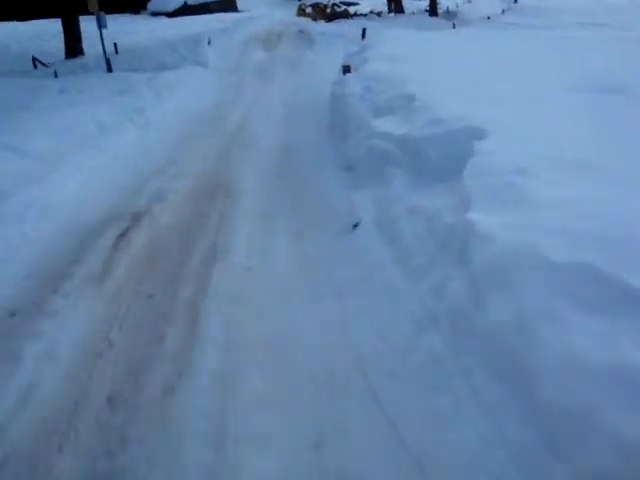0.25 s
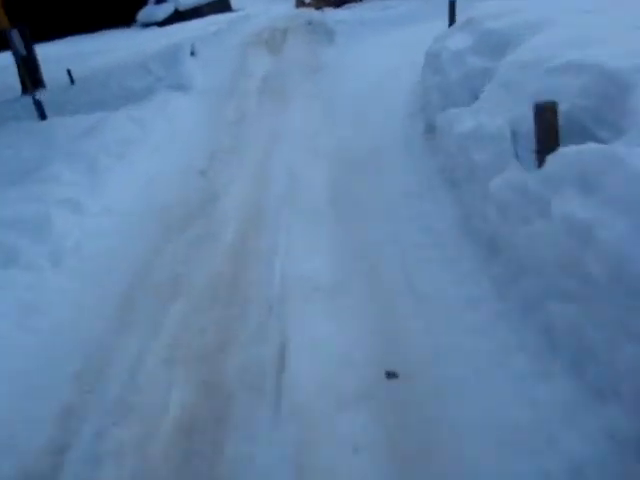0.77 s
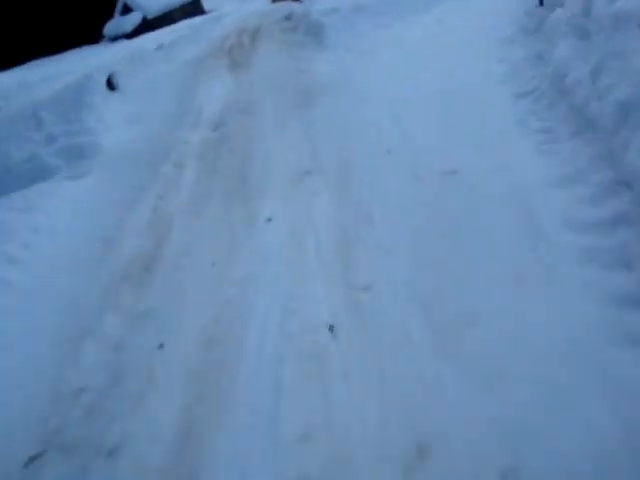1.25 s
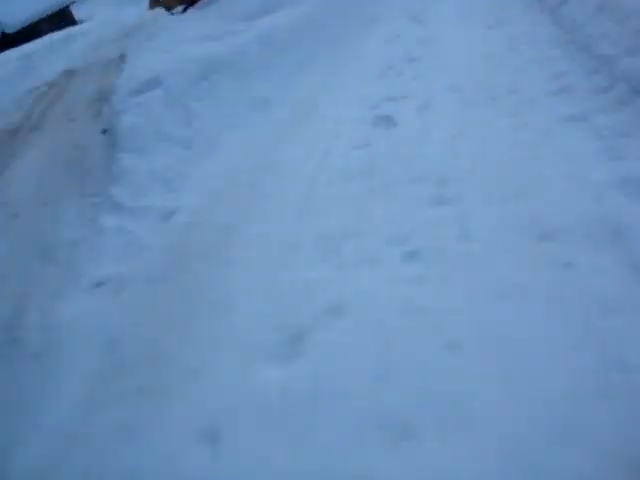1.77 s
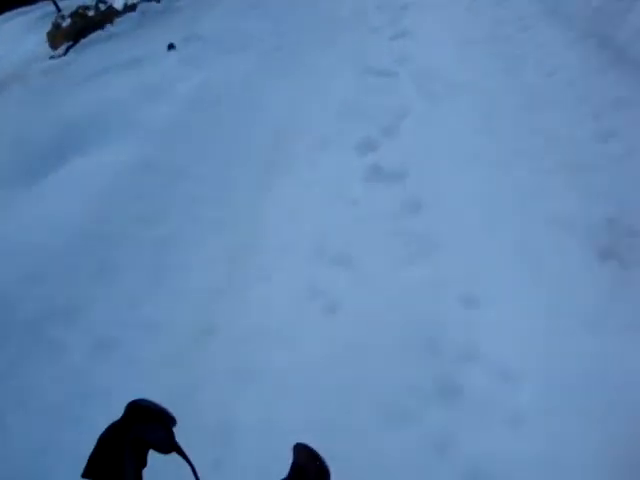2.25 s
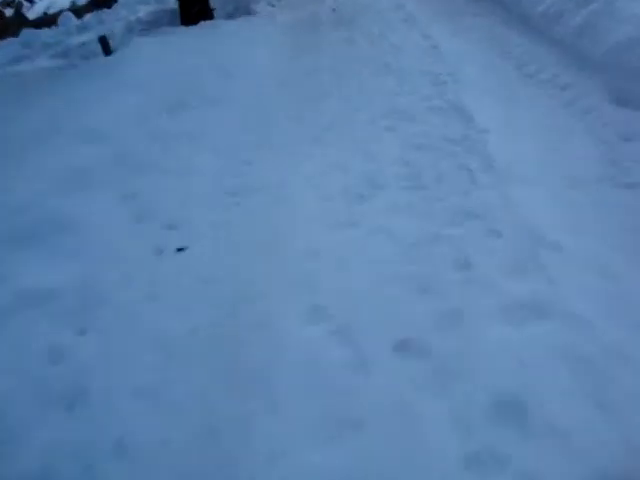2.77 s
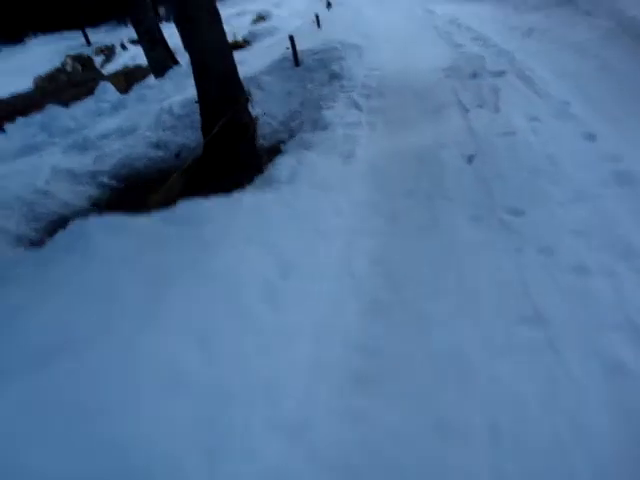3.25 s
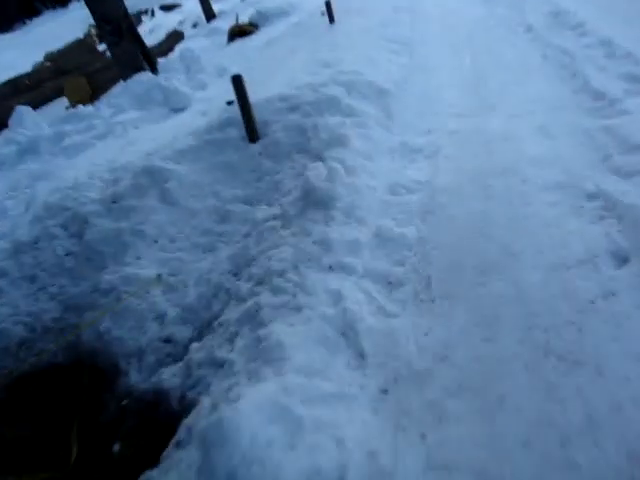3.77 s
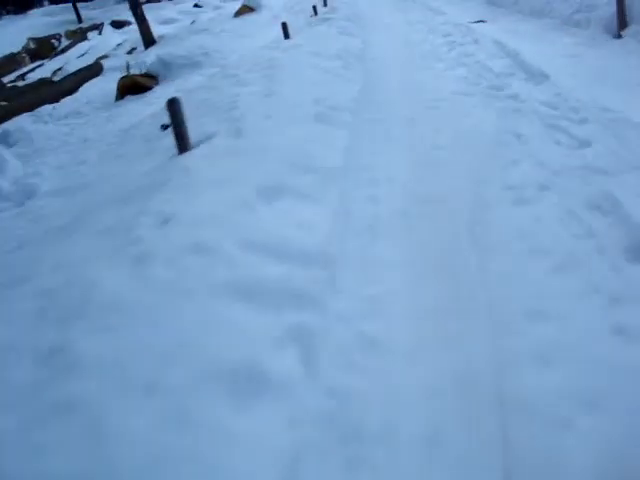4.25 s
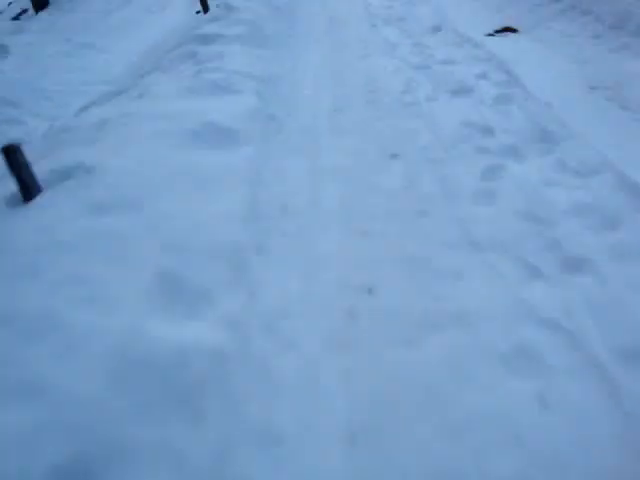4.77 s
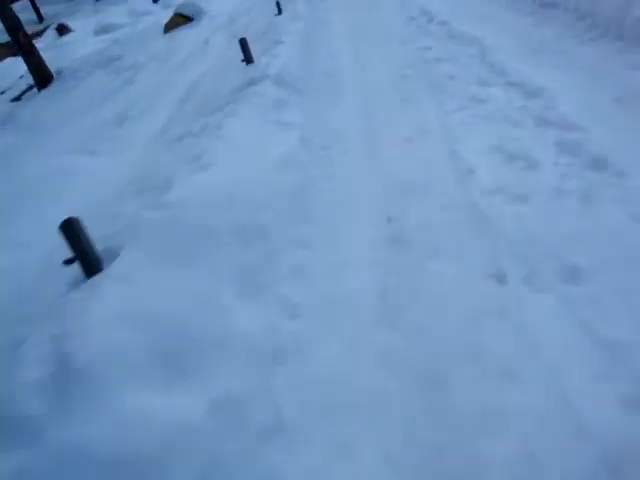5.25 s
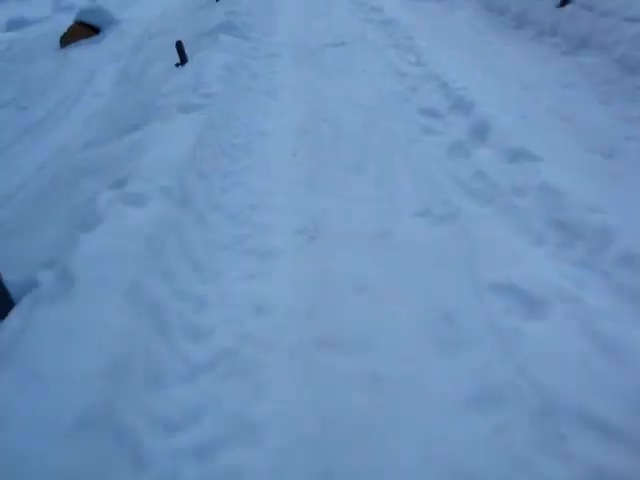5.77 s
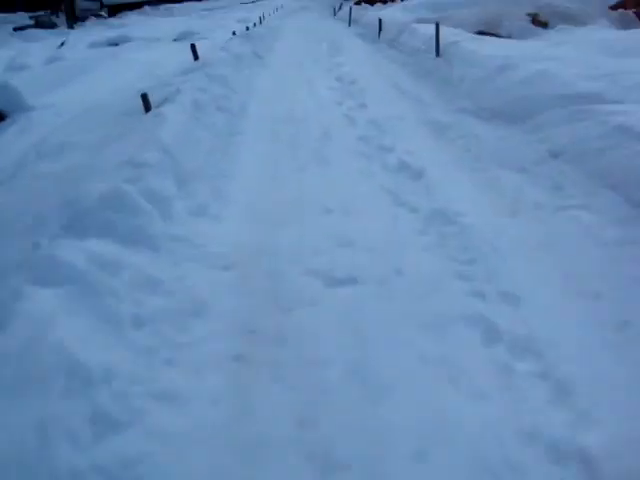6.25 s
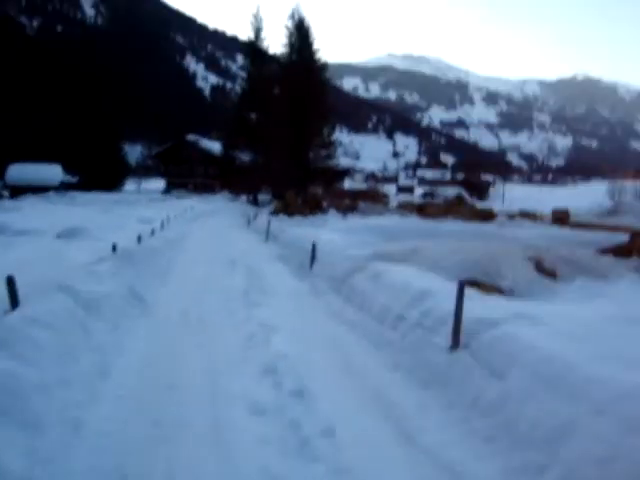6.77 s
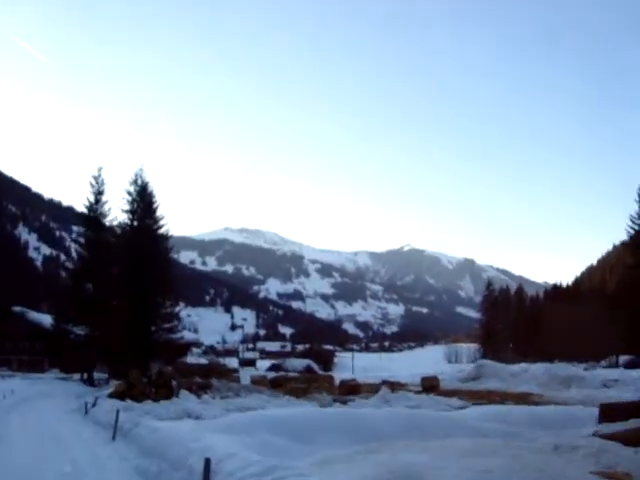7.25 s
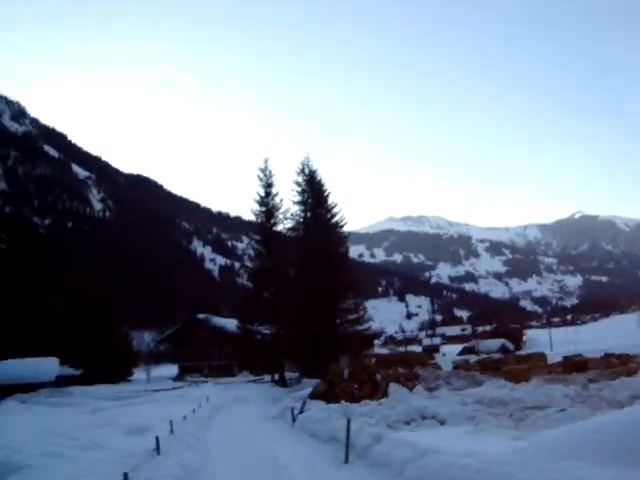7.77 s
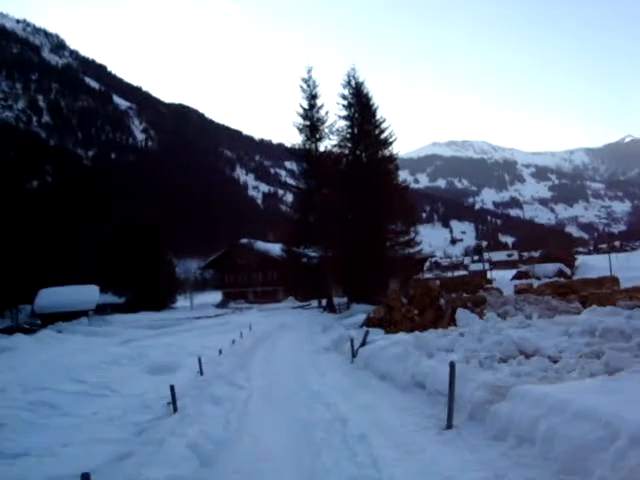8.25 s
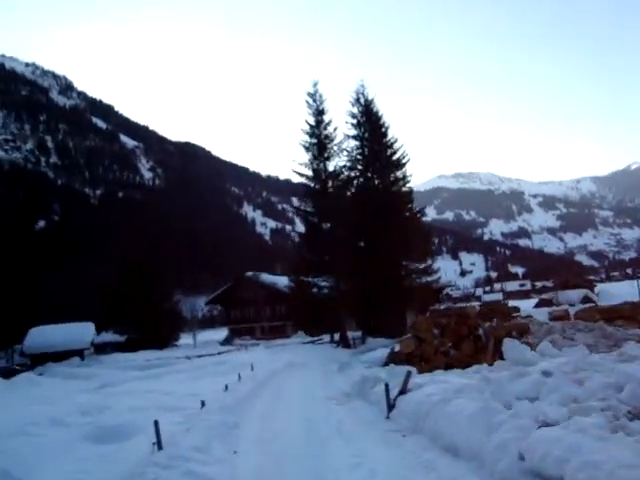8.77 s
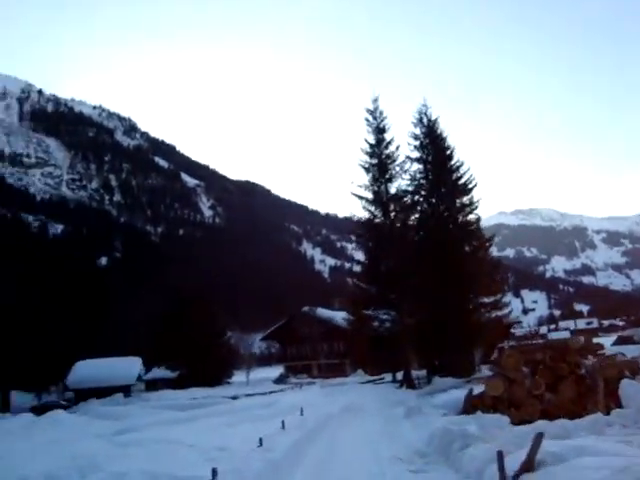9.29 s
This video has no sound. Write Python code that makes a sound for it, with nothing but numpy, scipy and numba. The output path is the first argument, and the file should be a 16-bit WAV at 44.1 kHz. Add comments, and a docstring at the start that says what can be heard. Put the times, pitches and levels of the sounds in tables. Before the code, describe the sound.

A wooden sled grinds and jolts over packed snow and ice, steel runners ringing and hissing, while wind roars and crackles across the microphone.

```python
"""On a packed snow track, a small camera rides on a wooden sled, its microphone close to runners and wind.
It opens in steady wind with three cracks; near 1 s the steel runners sing on ice and squeak twice.
From 2 to 6.3 s ridges jolt the sled; ground ice grains ring the frame and spray hisses under short gusts.
Wind returns at 6.4 s; near 7.1 to 7.6 s the runners almost vanish and hard eddies crack on the port.
Then the runners come back, jolting to the end. Grains and blows drive resonances; eddies are pulses."""
import sys
import numpy as np
from scipy import signal
from scipy.fft import rfft, irfft, next_fast_len
from scipy.io import wavfile
from scipy.ndimage import uniform_filter1d
from numba import njit

SR = 44100
rng = np.random.default_rng(int(sys.argv[2]) if len(sys.argv) > 2 else 0)


def waveform_to_disk(signal):
    """Save audio, clipped to [-1, 1], as 16-bit WAV at the path in sys.argv[1]."""
    frames = np.transpose(np.atleast_2d(signal))
    scaled = np.clip(frames, -1, 1) * 32767
    samples = np.round(scaled).astype(np.int16)
    wavfile.write(sys.argv[1], SR, samples)


N = 419832

# All levels are relative, ahead of the mix and the microphone.
# Runners under full load: start_s, spray_hiss_db, frame_ring_above_hiss_db
RUN = [(0, -34, 13.5), (.6, -33, 6), (.8, -33, 7), (1.05, -23.5, 2.5), (1.5, -21.5, 2), (2.0, -23, 3.5),
       (2.7, -24, 4), (3.25, -30, 2.5), (3.6, -21.5, 0.5), (3.95, -26.5, 1), (4.3, -32.5, 5.5),
       (4.55, -29.5, 2), (5.2, -26, 3.5), (6.0, -27, 4), (6.2, -26, 2.5), (6.5, -29.5, 3.5), (6.85, -28, 4),
       (7.06, -42.5, 13), (7.59, -57.5, 21.5), (7.7, -30, 10), (7.95, -34.5, 9), (8.4, -36, 10),
       (8.7, -34, 11.5), (9.25, -28.5, 8.5), (9.52, -24.5, 4)]
BUMPY_DB = 1.49  # spread of the fast bumps of the track
# Icy stretch: start_s, singing_above_hiss_db
ICE = [(.75, -6), (.92, 1.5), (1.12, 2), (1.3, -4), (3.2, -12)]
# Runners grind over ridges: peak_s, level_db, fall_by_6_db_ms (anything under .5 counts as .5 for the grind)
RIDGES = [(0.962, -13, 4), (2.099, -3, 5.5), (2.362, -2.5, 8), (2.437, -5.5, 5), (2.723, -14, 7),
          (3.118, -17, 19), (3.205, -2, 1), (3.227, -4.5, 23), (3.392, -11, 9), (3.513, 2, 2.5),
          (3.535, 0.5, 2), (3.603, -4.5, 4.5), (3.81, -8.5, 3.5), (3.897, -8, 1.5), (3.918, -2, 5.5),
          (3.938, -10, 34), (4.131, -8, 2), (4.152, -7, 6), (4.226, -1, 2.5), (4.243, -5.5, -1),
          (4.27, -8, 2.5), (4.281, 0, 1.5), (4.288, -4, 2), (4.317, -6, 2.5), (4.406, -12, 5),
          (4.504, -8, 63), (4.68, -5.5, 6), (4.729, -12, 6), (4.804, -9, 5), (4.824, -7, 2), (4.86, -8, 5),
          (5.191, -13, 2), (5.201, -8.5, 3), (5.384, -6, 2.5), (5.434, -7, 7), (5.468, -7, 4),
          (5.54, -9, 4), (5.713, -6, -2), (5.82, -11, 2), (6.077, -14, 4), (6.14, -6, 4), (6.195, -3, 3),
          (6.222, -3, -1), (6.249, -12, -1), (6.259, -6, 0), (6.825, -27, 37), (7.873, -12, 13),
          (7.924, -17, 8), (7.969, -8, 0), (8.081, -7.5, 9.5), (8.137, -5, 4), (8.143, -5, -1),
          (8.174, -4, 1), (8.208, -8.5, 4), (8.224, -6, 2), (8.324, -2.5, 4), (8.38, -8, -2),
          (8.429, -11, 3), (8.567, -16, 17), (8.61, -8.5, 16), (8.632, -5.5, 4), (8.697, -5.5, 11),
          (8.727, -10, 18), (8.756, -5, 4), (8.825, -17, 12), (8.964, -2.5, 2), (8.986, -2.5, 1.5),
          (9.032, -18, 4), (9.252, -5.5, 14), (9.408, -4, 11), (9.455, -11, -3), (9.489, -8, 8)]
JOLT_RISE_MS = 1.25  # the last 6 dB up to the peak
BLOW_DB, BLOW_DB_PER_MS = 6.5, -1.6  # a longer ridge is gentler
# The sled bounces and its runners grow light: landing_s, loss_just_before_db, length_s
HOPS = [(0.752, -8.5, 0.072), (1.271, -5.5, 0.19), (1.688, -4.5, 0.15), (2.209, -3.5, 0.24),
        (2.537, -5, 0.21), (2.843, -9.5, 0.079), (3.543, -8, 0.22), (3.813, -11.5, 0.2), (3.882, -7, 0.11),
        (4.087, -4.5, 0.04), (4.216, -18.5, 0.062), (4.787, -13.5, 0.0075), (4.932, -7, 0.087),
        (5.375, -5.5, 0.094), (5.417, -28, 0.026), (5.99, -4.5, 0.03), (6.116, -13, 0.027),
        (6.472, -10.5, 0.22), (6.789, -9.5, 0.18), (7.661, -21, 0.02), (7.904, -15, 0.26),
        (8.127, -8, 0.088), (8.365, -7.5, 0.1), (8.979, -7, 0.056), (9.386, -7.5, 0.15),
        (9.437, -17, 0.053)]
HOP_CURVE, LAND_S = 0.5, 0.015  # exponent of the loss; time for the load to return
# Resonances of the frame: centre_hz, width_hz, level_db
FRAME = [(966, 420, -4.5), (1376, 182, 3), (1847, 198, 0), (2410, 266, -2), (2970, 420, -11.5)]
# Steel runners singing on ice: centre_hz, width_hz, level_db
STEEL = [(1420, 120, 9), (2350, 56, 2), (3685, 200, 4.5)]
# Colour of the spray of crushed snow: frequency_hz, level_db (per Hz)
SPRAY = [(40, -64), (300, -16.5), (800, -7.5), (2000, -9), (3200, -0.5), (3700, -2), (4300, -3),
         (5500, -3.5), (7500, -11.5), (10400, -17)]
# A runner squeaks: start_s, length_s, start_pitch_hz, end_pitch_hz, level_db
SQUEAKS = [(0.852, 0.043, 2110, 2580, -28), (1.008, 0.022, 2330, 2320, -21), (6.494, 0.1, 1340, 1470, -27),
           (6.821, 0.037, 2320, 2340, -21)]
SQUEAK_WIDTH_HZ = 35.  # at the start pitch
# Steady wind at the microphone:
# start_s, level_db, eddy_pitch_hz, small_sharp_eddies_db, large_eddies_db (both against the level)
WIND = [(0, -25.5, 545, 2.5, -3), (.32, -26, 628, 5.5, -7.5), (.61, -19.5, 590, -8, -18),
        (.86, -22, 488, -4, -25), (1.08, -27, 423, -9, -14), (1.19, -42, 595, -7, -29),
        (1.9, -51.5, 740, -2, 1.5), (6.33, -52.5, 663, -1.5, -1), (6.39, -25.5, 335, -3, 4),
        (6.48, -22.5, 424, 3.5, 1), (6.64, -28, 448, -11, -10), (6.67, -16.5, 380, -5, -23),
        (6.72, -16.5, 517, -10.5, -25), (6.77, -17.5, 430, -11, -21), (6.82, -27, 412, 4, 0.5),
        (7.03, -18.5, 453, -6.5, 0.5), (7.15, -22.5, 652, 0, -7.5), (7.6, -25.5, 643, 4.5, -4),
        (7.63, -28.5, 507, 1.5, 1), (7.9, -34, 430, -0.5, 0), (8.24, -27.5, 345, -14, -3),
        (8.58, -25, 287, -9, -4), (8.66, -32.5, 312, -31, 4), (9.52, -37.5, 380, -24, 3)]
STEADY_BUSY = 2.2  # eddies of a steady wind come at least this many times as often as usual
# Short gusts: start_s, length_s, level_db, eddy_pitch_hz
GUSTS = [(2.111, 0.14, -35, 420), (2.383, 0.069, -38.5, 502), (2.794, 0.036, -33, 490),
         (2.877, 0.075, -22.5, 480), (2.98, 0.1, -32.5, 402), (5.473, 0.026, -38, 580),
         (5.621, 0.11, -26.5, 400), (5.757, 0.057, -30.5, 530), (6.024, 0.04, -26, 376),
         (6.142, 0.081, -30.5, 428), (6.265, 0.045, -32, 470)]
GUST_RISE_DB_S, GUST_FALL_DB_S = 550, 504
# Lone strong eddies and thumps: middle_s, level_db, pitch_hz
POPS = [(1.972, -14, 298), (1.995, -10, 500), (2.012, -13, 400), (2.022, -15, 330), (2.071, -10, 350),
        (2.082, -9, 280), (2.107, -4.5, 425), (2.157, -7, 350), (2.245, -13, 430), (2.274, -16, 300),
        (2.811, -21, 450), (2.837, 0.5, 610), (2.855, -12, 380), (2.876, -10, 480), (2.903, -2, 400),
        (2.932, -8, 380), (2.939, -9, 430), (2.996, -9, 550), (3.013, -7, 376), (3.059, -4.5, 398),
        (3.189, -8.5, 387), (3.535, -17, 766), (3.958, -7, 487), (4.225, -4.5, 553), (4.92, -20, 452),
        (5.379, -13.5, 453), (5.492, -13.5, 450), (5.627, -8, 374), (5.64, -2, 560), (5.658, -9, 420),
        (5.693, 2, 900), (5.7, -9, 600), (5.706, -2, 950), (5.765, -6, 604), (5.78, -7, 450),
        (5.809, -18, 500), (5.866, -13, 278), (5.896, -5, 480), (5.91, -2, 596), (6.048, -13, 480),
        (6.07, -13, 353), (6.105, -12, 480), (6.154, -1, 430), (6.165, -5, 600), (6.185, -4, 453),
        (6.202, -13, 500), (6.224, -7, 700), (6.292, -6, 500), (6.301, -9, 425), (6.405, -2, 616),
        (6.465, -6, 450), (6.482, -3, 408), (6.487, -3, 550), (6.52, -4, 560), (8.535, -11, 417)]
# Hardest eddies cracking on the microphone port: middle_s, bright_edge_db
CRACKS = [(0.038, -9), (0.399, -21), (0.463, -11), (7.0594, -18), (7.0756, -10), (7.11, -9), (7.1278, -14),
          (7.1462, -16), (7.152, -10.5), (7.1768, -14), (7.1925, -25), (7.2132, -11), (7.221, -18),
          (7.237, -14), (7.242, -18), (7.2495, -12), (7.2541, -20), (7.2656, -15), (7.281, -15),
          (7.29, -25), (7.302, -17), (7.311, -20), (7.33, -21), (7.3325, -16), (7.344, -18), (7.353, -23),
          (7.36, -14), (7.364, -10), (7.388, -20), (7.3945, -17), (7.3977, -12), (7.4335, -18),
          (7.4512, -16), (7.5013, -16), (7.5137, -15), (7.5285, -11.5), (7.5478, -16), (7.568, -16),
          (7.5921, -9.5), (7.609, -8)]
CRACK_HZ, CRACK_EDGE_HZ = 940, 1730
CRACK_EDGE_DB = -13  # edge against the body
CRACK_SUCTION = 0.43  # makes the first half-cycle the deeper
TOP_HZ = 10010  # where the microphone's treble ends


def sled():
    """Grinding follows the bumps of the track; it rings frame and runners and sprays snow."""
    hiss_db, ring_db = curves(RUN)
    ice_db, = curves(ICE)
    load = load_db()
    bumps_db = BUMPY_DB * (0.61 * walk(45) + walk(110))
    grind = undb(hiss_db + load + bumps_db)
    burst, blow = jolts()

    frame = unit(ring_out(grains(7000, 3.2), FRAME))
    ring = frame * (grind * undb(ring_db) + undb(-11.0) * burst)
    steel = unit(ring_out(grains(9000, 1.3), STEEL, drift=0.012, patchy_db=2.0))
    sing = steel * grind * undb(ice_db)
    thud = svf(blow, np.full(N, 800.), 0.45)[1]
    knock = undb(12.0) * ring_out(blow, FRAME) + undb(18.5) * thud
    # where the frame rings more, or the load is less, the high band of the spray is weaker
    snow = spray(0.25 * ring_db - .5 * load) * (grind + undb(-21.0) * burst)
    return ring + sing + squeaks() + knock + snow


def jolts():
    """Grinding swells quickly up each ridge and dies away behind; a rounded blow is stronger on short ridges."""
    burst, blow = np.zeros(N + SR), np.zeros(N)
    before = SR // 25
    ms = np.arange(-before, SR // 10) / SR * 1000
    for s, db, fall_ms in RIDGES:
        fall_ms = max(fall_ms, .5)
        start = int(s * SR) - before
        steps_down = np.where(ms < 0, (ms / JOLT_RISE_MS) ** 2, (ms / fall_ms) ** 1.3)
        burst[start:start + len(ms)] += undb(db - 6 * steps_down)
        hit = int((s - JOLT_RISE_MS / 1000) * SR)
        blow[hit] = undb(db + BLOW_DB + BLOW_DB_PER_MS * fall_ms)
    return burst[:N], svf(blow, np.full(N, 4500.), 1.6)[0]


def load_db():
    """Through each hop the load drops away; it is back almost at once on landing."""
    t = np.arange(N) / SR
    total_db = np.zeros(N)
    for s, db, length in HOPS:
        lightness = np.interp(t, [s - max(length, .01), s, s + LAND_S], [0, 1, 0])
        total_db += db * lightness ** HOP_CURVE
    return total_db


def ring_out(push, modes, drift=0.051, patchy_db=1.5):
    """Resonances whose pitch and level each waver at random."""
    out = np.zeros(N)
    for k, (hz, width, db) in enumerate(modes):
        level = undb(db + patchy_db * walk(30))
        centre_hz = hz * (1 + drift * walk(8))
        # neighbouring modes have opposite signs
        out += (-1) ** k * level * svf(push, centre_hz, width / hz)[1]
    return out


def spray(dull_db, patchy_db=1.64, finer=0.2):
    """Crushed snow: low, middle and high bands of the hiss flutter separately; dull_db weakens the high one."""
    hiss = unit(colour(grains(15000, 2.6), SPRAY))
    low, low_and_middle = [svf(hiss, np.full(N, hz), 1.12)[0] for hz in (3300., 6200.)]
    high = (hiss - low_and_middle) * undb(-dull_db)
    out = np.zeros(N)
    for k, part in enumerate((low, low_and_middle - low, high)):
        # the higher bands of the hiss flutter more
        out += part * undb(patchy_db * (1 + finer * k) * walk(60))
    return out


def squeaks():
    """Short narrow rings, noise through a gliding resonance, that swell and fade."""
    out = np.zeros(N)
    for s, length, start_hz, end_hz, db in SQUEAKS:
        size, start = int(length * SR), int(s * SR)
        hz = np.linspace(start_hz, end_hz, size)
        rub = rng.standard_normal(SR // 5)[:size]
        ring = svf(rub, hz, SQUEAK_WIDTH_HZ / start_hz)[1]
        out[start:start + size] += undb(db) * unit(ring) * np.sqrt(np.hanning(size))
    return out


def wind():
    """A dense roar of large eddies, sparser snaps of small ones, lone pops; a stronger gust is denser."""
    gust_db, hz, snap_db, large_db, busy = gusts()
    large = eddies(500 * busy, 0.62 * hz, edge_db=-15.0)
    middle = eddies(600 * busy, 1.32 * hz, edge_db=-33.0, damp=0.91, spread_db=2.4)
    snaps = eddies(150 * busy, 2.35 * hz, edge_db=-30, spread_db=2.0)
    roar = undb(large_db) * large + middle
    out = undb(gust_db + 5) * (roar + undb(snap_db) * snaps)
    for s, db, pop_hz in POPS:
        cycles = np.arange(-2, 2, pop_hz / SR)
        start = int(s * SR) - len(cycles) // 2
        pulse = (np.sin(2 * np.pi * cycles) - 0.4) * np.exp(-(cycles / 0.44) ** 2)
        out[start:start + len(cycles)] += undb(db + 1.0) * pulse
    return out


def gusts():
    """Level, pitch and density of the wind: a short gust takes over while stronger, and may be sparser."""
    t = np.arange(N) / SR
    level_db, hz, snap_db, large_db = curves(WIND)
    least_busy = np.full(N, STEADY_BUSY)
    for s, length, db, gust_hz in GUSTS:
        rise_db = GUST_RISE_DB_S * np.maximum(s - t, 0)
        fall_db = GUST_FALL_DB_S * np.maximum(t - s - length, 0)
        gust_db = db - rise_db - fall_db
        stronger = gust_db > level_db
        hz = np.where(stronger, gust_hz, hz)
        least_busy = np.where(stronger, .18, least_busy)
        level_db = np.maximum(gust_db, level_db)
    busy = np.clip(undb(.6 * (level_db + 23)), least_busy, 4)
    return level_db, hz, snap_db, large_db, busy


def eddies(rate, hz, edge_db, spread_db=0.5, damp=1.11):
    """Pressure pulses of wandering pitch: a body of rms 1 plus a sharper edge, evened out over the rate."""
    even = np.sqrt(np.mean(rate) / rate)
    burst = grains(rate, spread_db) * even * undb(0.76 * walk(70))
    hz = hz * undb(0.96 * walk(60))
    body = svf(svf(burst, hz, damp)[0], hz, damp)[0]
    edge = svf(svf(burst, 1.1 * hz, 0.34)[0], 0.65 * hz, 2.5)[0]
    return unit(body) + undb(edge_db) * unit(edge)


def cracks():
    """Each one cycle, suction then pressure, with a cycle about twice as long as its steeper middle."""
    s, db = np.transpose(CRACKS)
    push, t = np.zeros(N), np.arange(-88, 89) / SR
    push[(s * SR).astype(int)] = undb(db)

    def cycle(hz):
        """One cycle under a bell-shaped envelope."""
        return (np.sin(2 * np.pi * hz * t) - CRACK_SUCTION) * np.exp(-(hz * t / .45) ** 2)

    pulse = cycle(CRACK_HZ) / undb(CRACK_EDGE_DB) + cycle(CRACK_EDGE_HZ)
    return signal.fftconvolve(push, pulse, mode="same")


def grains(rate, spread_db):
    """Random clicks, rate a second, some much bigger than the rest; rms 1."""
    there = rng.random(N) < rate / SR
    size_db = spread_db * np.minimum(rng.exponential(size=N), 4)
    return unit(there * np.clip(rng.standard_normal(N), -2, 2) * undb(size_db))


def walk(rate):
    """Random levels held 1 / rate s and slewed, without slow drift; rms 1."""
    k = int(SR / rate)
    held = np.repeat(rng.standard_normal(N // 20), k)[:N]
    slewed = uniform_filter1d(held, k)
    drift = uniform_filter1d(slewed, 4 * k)
    return unit(np.tanh((slewed - drift) / 1.2))


def colour(x, points):
    """Shape a noise by (Hz, dB) points, joined by lines over log frequency."""
    hz, db = np.transpose(points)
    size = next_fast_len(N)
    log_hz = np.log(np.maximum(np.arange(size // 2 + 1) * SR / size, 1))
    gain = undb(np.interp(log_hz, np.log(hz), db))
    return irfft(rfft(x, size) * gain, size)[:N]


@njit
def svf(x, hz, damp):
    """State-variable filter with a moving centre: low-pass and band-pass of gain 1."""
    out, b, l = np.empty((2, len(x))), 0., 0.
    for i in range(len(x)):
        g = np.tan(np.pi * hz[i] / SR)
        v = (b + g * (x[i] - l)) / (1 + g * (g + damp))
        out[0, i], out[1, i] = l + g * v, damp * v
        b, l = 2 * v - b, l + 2 * g * v
    return out


def curves(table):
    """Columns of a table, sample by sample."""
    s, *columns = np.transpose(table)
    return [np.interp(np.arange(N) / SR, s, c) for c in columns]


def undb(db):
    """dB to gain."""
    return 10 ** (np.asarray(db) / 20)


def unit(x):
    """Scale to rms 1."""
    return x / np.sqrt(np.mean(x ** 2))


def scene():
    """Sled, wind and cracks at one microphone."""
    return (sled() + wind() + cracks())[None]


def record(dry):
    """The camera's microphone thins the bass, rounds the peaks and cuts the top."""
    thin = signal.sosfilt(signal.butter(N=2, Wn=260., btype="high", fs=SR, output="sos"), dry)
    soft = 0.6 * np.tanh(thin / 0.61)
    thin = signal.sosfilt(signal.butter(N=1, Wn=120., btype="high", fs=SR, output="sos"), soft)
    return signal.sosfilt(signal.ellip(14, .5, 50, TOP_HZ, fs=SR, output="sos"), thin)


dry = scene()
out = record(dry)
waveform_to_disk(out)
```